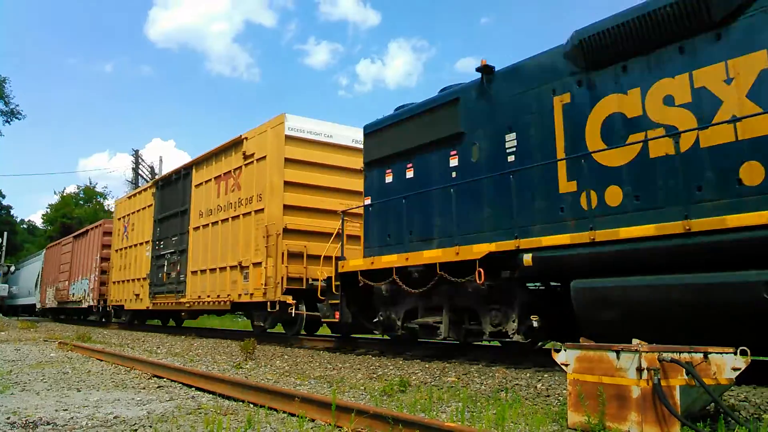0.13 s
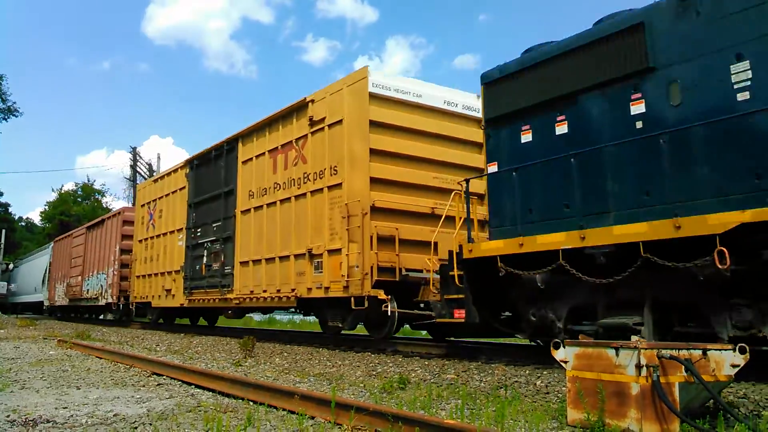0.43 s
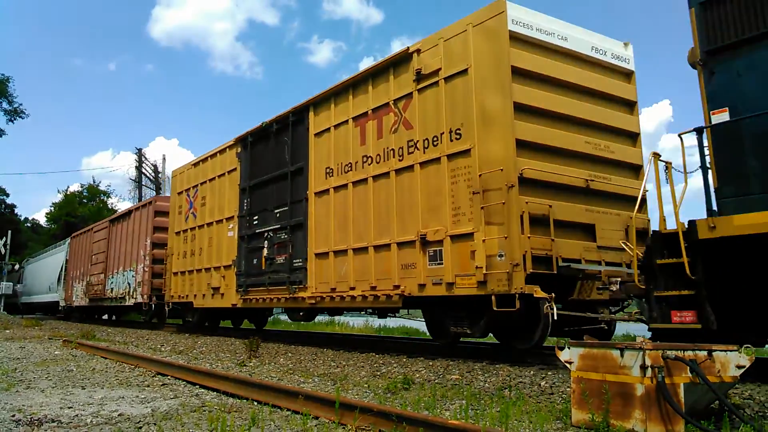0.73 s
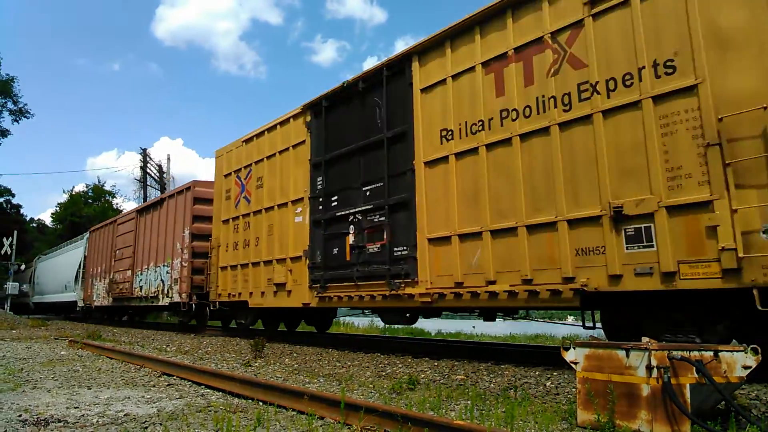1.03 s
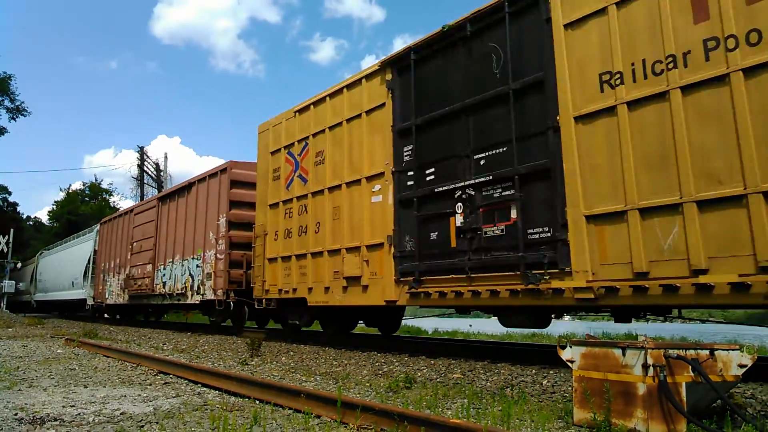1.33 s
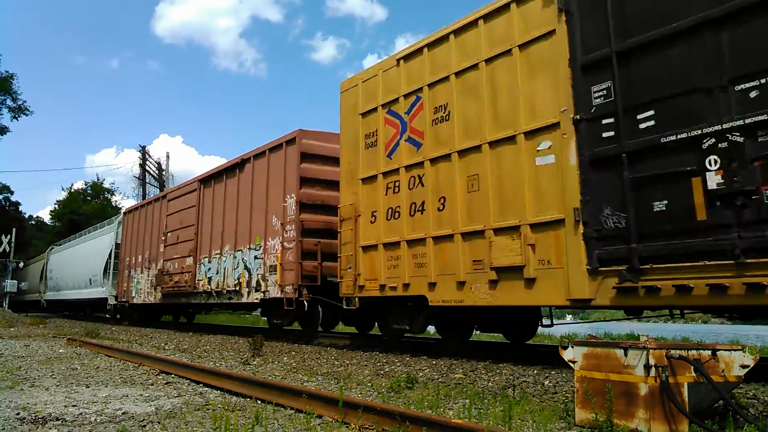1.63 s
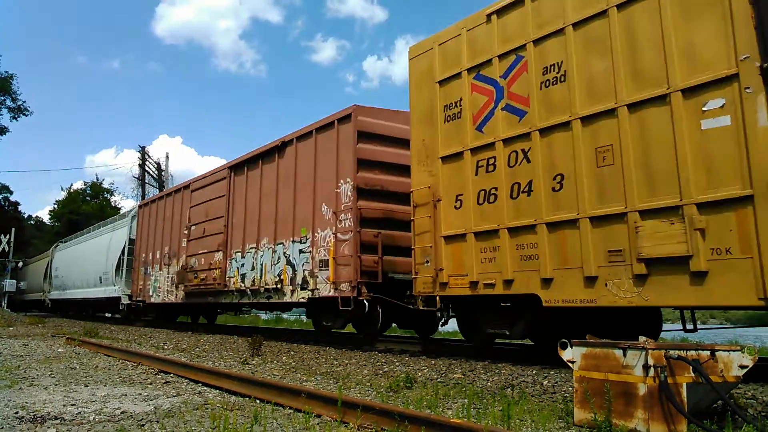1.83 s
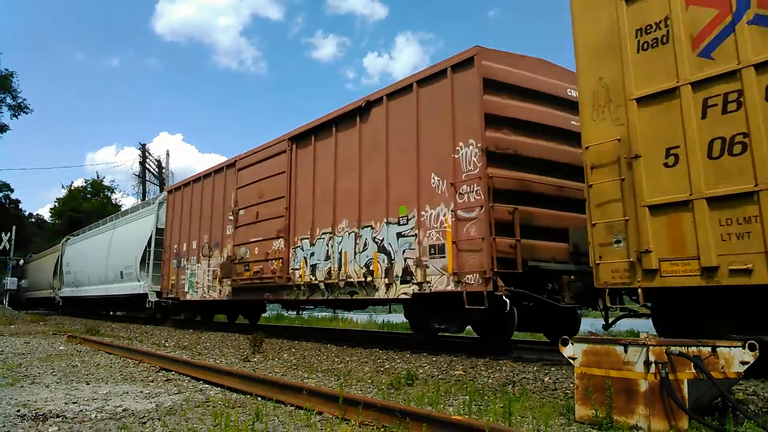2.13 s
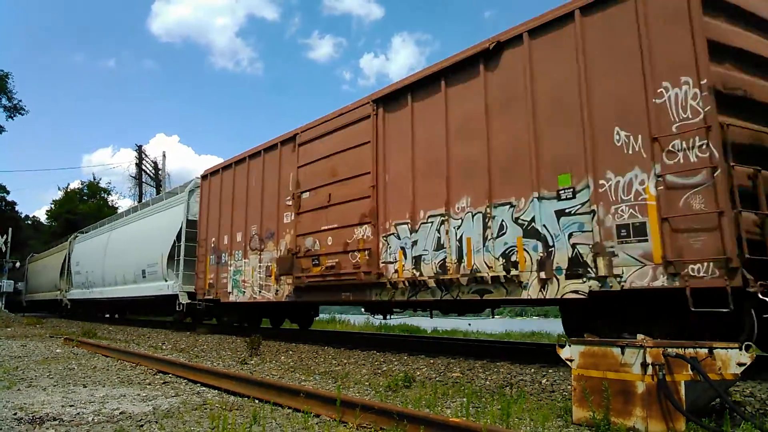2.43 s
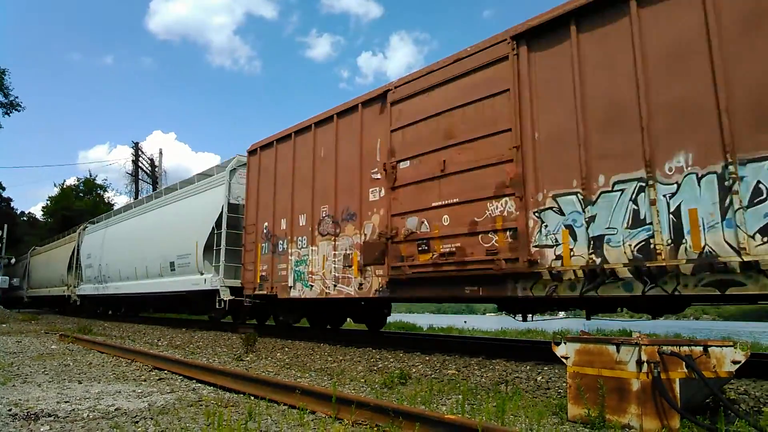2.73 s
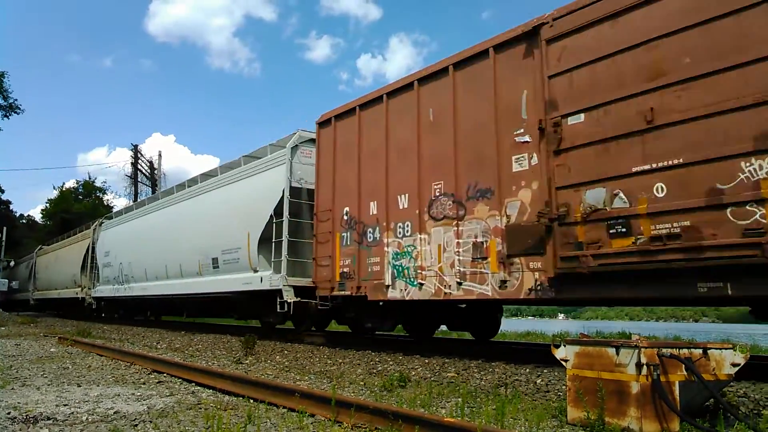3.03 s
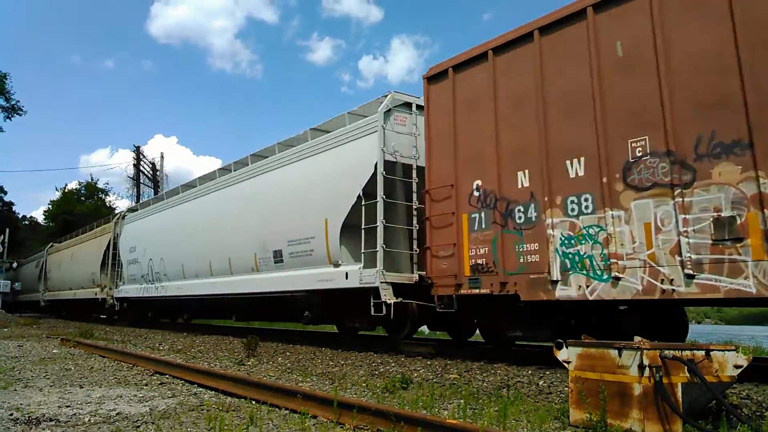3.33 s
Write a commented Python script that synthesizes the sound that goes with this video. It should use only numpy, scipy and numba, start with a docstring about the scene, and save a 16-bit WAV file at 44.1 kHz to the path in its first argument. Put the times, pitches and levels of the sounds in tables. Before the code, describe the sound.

Heavy freight cars rumble past, thudding and hissing, with sharp metallic wheel clangs and brief squeals

```python
"""First the deep rumble and hollow boom of a freight train rolling by close at hand, under a thin steel squeal.
Rolling contact is noise shaped in six frequency ranges; the hollow cars boom as one wavering low resonance.
Wheels strike a spot on the rail: each strike cracks, excites the wheel's modes and rasps through them.
Flanges scrape, scuff and squeal briefly, and couplers and running gear knock.
A dull microphone and a fast limiter follow: loud peaks push the whole sound down for a moment."""
import sys
import numpy as np
from scipy import signal
from scipy.fft import rfft, irfft
from scipy.io import wavfile
from scipy.ndimage import uniform_filter1d, minimum_filter1d
from numba import njit

SR = 44100
rng = np.random.default_rng(int(sys.argv[2]) if len(sys.argv) > 2 else 0)


def inscribe(sig):
    """Save sig as 16-bit PCM at rate SR to the path in sys.argv[1].

    A 1-D sig is mono; a 2-D sig holds one channel per row.
    Samples are clipped to [-1, 1] before scaling.
    """
    pcm = np.round(np.clip(np.atleast_2d(sig).T, -1, 1) * 32767)
    wavfile.write(sys.argv[1], SR, pcm.astype(np.int16))


N = 153468
TIME = np.arange(N) / SR  # [s]

# rolling noise in six ranges, from low to high: (time [s], level [dB]); rumble is lifted by a further 4 dB
RUMBLE = [(0.0, -13.5), (0.45, -17), (0.51, -26), (0.63, -11.5), (0.71, -24), (0.77, -23), (1.16, -15),
          (1.18, -21.5), (1.57, -9), (1.77, -23), (1.86, -10), (2.1, -15), (2.2, -18), (3.01, -17),
          (3.38, -17), (3.48, -22)]
BODY = [(0.0, -13.5), (0.06, -9.5), (1.04, -10), (1.06, -14), (1.34, -15.5), (2.1, -16), (2.14, -24),
        (2.18, -5.5), (2.23, -21.5), (2.6, -9.5), (2.68, -20), (3.08, -5.5), (3.12, -13.5), (3.48, -3.5)]
GROWL = [(0.0, -22.5), (0.21, -14), (0.32, -20), (0.59, -14), (1.32, -19.5), (1.37, -27), (1.45, -16.5),
         (1.85, -21.5), (1.88, -18), (2.01, -23.5), (2.49, -24.5), (2.5, -34), (2.64, -36), (2.67, -32),
         (3.36, -24.5), (3.48, -14.5)]
ROAR = [(0, -26.5), (.2, -21), (.37, -23), (.5, -20), (.72, -20), (.9, -26), (1.03, -22.5), (1.22, -33.5),
        (1.5, -27.5), (1.65, -35), (1.76, -31.5), (1.9, -32.5), (2.1, -34.5), (2.5, -36.5), (2.77, -35),
        (2.93, -28), (3.1, -30), (3.48, -34.5)]
CLATTER = [(0, -28), (.6, -28.5), (.95, -31), (1.5, -34), (1.8, -33), (1.98, -33.5), (2.1, -35.5),
           (2.42, -34), (2.52, -34.5), (2.76, -35), (2.9, -33), (3.48, -31.5)]
HISS = [(0, -23.5), (.2, -24), (.36, -30.5), (.6, -29.5), (.92, -31.5), (1.3, -23), (1.57, -24),
        (1.67, -28), (1.82, -29), (1.95, -29), (2.1, -33.5), (2.26, -28.5), (2.5, -36), (2.65, -32),
        (3.48, -25)]
# borders of those six ranges: [Hz]
RANGE_EDGES_HZ = [20, 110, 380, 680, 1400, 3600, 11000]
# relative spectra of the rolling noise: (frequency [Hz], density [dB per Hz])
LOW_COLOUR = [(20, -39), (31, -7), (40, -33), (50, 6), (63, -5.5), (78, -2.5), (100, -2.5), (140, -4),
              (230, -3), (320, -8.5), (480, -16), (750, -26)]
ROAR_COLOUR = [(600, 2), (750, -2), (950, 0), (1120, -3.5), (1260, -8), (1500, -7)]
HIGH_COLOUR = [(1400, 7), (2000, 3.5), (2700, 2), (3200, 0.5), (3650, -5), (4000, -3), (4300, -5),
               (5000, 1.5), (5700, 3), (6500, -3.5), (7200, -9.5), (7900, -33), (9000, -22), (9800, -38)]
# hollow boom of the car bodies, about which it wavers: (time [s], frequency [Hz], level [dB])
BOOM = [(0, 76.3, -10), (.3, 74.1, -26), (.65, 79.76, -15.5), (.97, 80.6, -17), (1.2, 83, -22.5),
        (1.9, 79.36, -21), (2.3, 74.33, -11), (2.62, 78.66, -9), (2.8, 70.6, -7.5), (2.96, 78.6, -10.5),
        (3.08, 79.3, -23.5), (3.48, 80.4, -10.5)]
# modes of three kinds of wheel: (frequency [Hz], relative level [dB], time to fall by 60 dB [s])
WHEELS = { "bright": [(1860, -12, .7), (3200, -17, .9), (3970, -18, .7), (4702, -7, .45), (4786, -6, .5),
          (5184, -5, .35), (5321, -14, .35), (5429, 1, .45), (5644, -8, .35), (6027, -3, .6),
          (6573, -9, .55), (6770, -6, .4), (7675, -22, .5), (8330, -28, .6)], "shrill": [(1954, -18, .4),
          (3225, -16, .8), (3950, -20, .7), (4519, -11, .4), (4791, -16, .5), (5198, -9, .45),
          (5273, 1, .55), (5424, -7, .45), (5895, -1, 1.1), (6032, -8, .6), (6412, -6, .75), (6603, -2, .7),
          (6681, -8, .6), (9400, -27, .8)], "mellow": [(1577, -16, .35), (2223, -14, .35), (3460, -13, .3),
          (4153, -6, .35), (4239, -11, .4), (4412, -12, .7), (4580, -9, .45), (4685, -2, .6),
          (5015, -4, .35), (5250, 0, .8), (5920, -6, .9), (6420, -16, .4), (6745, -8, .4), (8390, -31, .7),
          (9275, -28, .5)]}
# wheel strikes: (time [s], ring level [dB], crack level [dB], rasp level [dB], rubbing length [s],
# detuning [Hz], most excited frequency [Hz], kind of wheel)
STRIKES = [(1.035, -3.5, -9, -9.5, 0.018, 2.5, 5300, "bright"),
           (1.18, -8, -11.5, -11, 0.055, 5, 6370, "shrill"),
           (2.684, -16, -16.5, -25, 0.017, -23.5, 4650, "mellow"),
           (2.826, -16.5, -18, -26.5, .025, -5.5, 5450, "mellow"),
           (3.017, -10.5, -15.5, -22.5, 0.074, 6, 5240, "mellow"),
           (3.166, -12.5, -10, -23.5, 0.035, -24.5, 4690, "mellow")]
# landings of a hopping wheel: (time [s], level [dB])
HOPS = [(2.718, -17.5), (2.848, -11.5), (3.048, -6), (3.083, -12), (3.19, -19), (3.31, -17)]
# relative spectra of the steel contact: (frequency [Hz], density [dB per Hz])
CRACK_COLOUR = [(500, -29), (1200, -43), (2100, 10), (2800, -22), (3400, 9), (3800, -6), (4800, 11),
                (6700, 6), (7900, -18), (9400, -11), (10000, -49)]
RASP_COLOUR = [(1500, -13.5), (2700, -11.5), (3350, -13.5), (3700, -19), (4500, -13.5), (5400, -5.5),
               (6700, -2), (7100, -3.5), (7650, -6.5), (8050, -40.5), (8500, -12.5), (9450, -22.5),
               (9900, -31.5)]
SCUFF_COLOUR = [(3500, -7), (4600, -4.5), (5600, 6), (6200, -2), (7200, -36)]
# flange scrapes, then short dry scuffs: (time [s], length [s], level [dB])
SCRAPES = [(1.399, 0.084, -14.5), (2.207, 0.015, -30.5)]
SCUFFS = [(0.486, 0.027, -17.5), (0.544, 0.045, -22.5), (1.712, 0.083, -29), (1.902, 0.09, -26)]
# flange squeals: (time [s], length [s], frequency [Hz], waver width [Hz], level [dB])
SQUEALS = [(0, .2, 7050, 25, -36), (0, .22, 9020, 25, -50), (1.415, .07, 2205, 70, -25),
           (1.415, .08, 3965, 120, -25), (1.45, .07, 4480, 70, -28), (1.41, .1, 6450, 130, -22),
           (1.42, .09, 6720, 150, -24), (1.92, .1, 2760, 450, -37), (2.16, .08, 2570, 350, -36),
           (3.1, .2, 5925, 20, -22), (3.34, .04, 2450, 90, -32)]
# knocks of couplers and running gear: (time [s], thud level [dB], clank level [dB], decay constant [s])
KNOCKS = [(0.064, -18, -26, 0.013), (0.203, -6.5, -27.5, 0.0083), (0.252, -16, -20.5, 0.019),
          (.303, -15.5, -31, 0.0091), (.669, -15, -35, 0.015), (.857, -7, -30, 0.0099),
          (1.16, -13, -42, 0.0094), (1.455, -8.5, -31, 0.0097), (1.523, -7, -26, 0.0079),
          (1.61, -14.5, -35, 0.013), (1.703, -14, -33.5, 0.011), (1.875, -12, -50, 0.066),
          (2.191, -27, -26.5, 0.047), (2.245, -14, -27, 0.046), (2.385, -18, -26.5, 0.05),
          (2.428, -22, -33.5, 0.048), (2.456, -17, -45, 0.0058), (2.595, -15.5, -20, 0.0097),
          (2.617, -21, -22.5, 0.032), (2.925, -24, -38, 0.013), (3.004, -23, -28.5, 0.018),
          (3.182, -4, -26, 0.015)]
# relative spectra of the knocks: (frequency [Hz], density [dB per Hz])
THUD_COLOUR = [(60, -21), (140, -1), (240, 10.5), (400, 5), (700, -12), (1400, -55)]
CLANK_COLOUR = [(500, -32), (900, 5), (1250, -2.5), (1650, 6), (2200, 2.5), (3200, -9.5), (4500, -10),
                (7500, -40.5)]
# brief dips of the whole level: (time [s], half width [s], level [dB])
DIPS = [(0.335, 0.015, -5.5), (.652, 0.019, -2), (1.68, 0.02, -2.5)]

# the point of contact favours the modes near one frequency
FAVOUR_DB, FAVOUR_WIDTH_HZ = 3.5, 640
# random roughness (share of the tone) and swelling of each ringing mode
RING_ROUGH, RING_WIDTH_HZ, RING_SWELL_DB, RING_SWELL_RATE_HZ = .4, 35, 2.5, 7
RING_ATTACK_S, CRACK_RELEASE_S, RASP_RELEASE_S = 0.00084, .012, 0.098
# peak width of rubbing noise at a mode, and its floor between modes
RASP_WIDTH_HZ, RASP_BETWEEN_DB = 110, -10
# share of its first pitch that a passing wheel loses each second
DOPPLER_FALL_PER_S = .04
# scales of the shimmering patches in frequency, strength and time
PATCH_SCALE_HZ, PATCH_DB, PATCH_RATE_HZ = 75, 4.5, 10.2
# recording chain; LIMIT is a share of full scale
MIC_TOP_HZ, TOP_HZ, DRIVE_DB = 9600, 16000, -0.5
LIMIT, LIMIT_RELEASE_S = .982, 0.018


def rolling():
    """Roughness excitation: rough wheels on rough rail give rumble, shaking bodies, growl, roar, clatter and hiss."""
    edge = RANGE_EDGES_HZ
    jolt = walk(25)  # shared by the upper four ranges

    rumble = colour(rng.standard_normal(N), LOW_COLOUR, edge[0:2])
    rumble = rumble * undb(curve(RUMBLE) + 4.0)

    body = colour(grit(250, spread_db=-2.0, smooth=1.0), LOW_COLOUR, edge[1:3])
    body = body * undb(curve(BODY) + 1.36 * walk(5.7))

    growl = colour(grit(300, spread_db=1.5, smooth=.9), LOW_COLOUR, edge[2:4])
    growl = growl * undb(curve(GROWL) + 1.3 * jolt)

    roar = colour(grit(500, spread_db=1.5, smooth=.9), ROAR_COLOUR, edge[3:5])
    roar = shimmer(roar, depth=.55) * undb(curve(ROAR) + .8 * jolt)

    clatter = colour(grit(700, spread_db=1.6, smooth=.9), HIGH_COLOUR, edge[4:6])
    clatter = shimmer(clatter) * undb(curve(CLATTER) + .9 * jolt)

    hiss = colour(grit(1500, spread_db=1.8, smooth=.9), HIGH_COLOUR, edge[5:7])
    hiss = shimmer(hiss) * undb(curve(HISS) + .8 * jolt)
    return rumble + body + growl + roar + clatter + hiss


def boom():
    """Cavity resonance: the hollow cars sound one low tone that wavers in pitch and level."""
    frequency = curve(BOOM) + 3 * walk(7.4)
    phase = 2 * np.pi * np.cumsum(frequency) / SR
    level = undb(curve(BOOM, axis=2) + 4.2 * walk(7.4))
    return np.sqrt(2) * np.sin(phase) * level


def wheels():
    """Impact and friction excitation: strikes crack, ring and rasp; rubbing sustains the ring; hops land."""
    out = np.zeros(N)
    crack = colour(rng.standard_normal(N), CRACK_COLOUR)
    rub = colour(rng.standard_normal(N), RASP_COLOUR)
    rasp = {kind: through_wheel(rub, np.array(modes)) for kind, modes in WHEELS.items()}
    for start, ring_db, crack_db, rasp_db, length, detune_hz, favoured_hz, kind in STRIKES:
        first = int(start * SR)
        age = TIME[:min(SR, N - first)]  # each ring is followed for at most 1 s
        ring = wheel_ring(np.array(WHEELS[kind]), age, length, detune_hz, favoured_hz)
        out[first:first + len(age)] += undb(ring_db) * ring
        out += undb(crack_db) * crack * envelope(start - .002, 0.00086, 0.009, CRACK_RELEASE_S)
        out += undb(rasp_db) * rasp[kind] * envelope(start, 0.0067, length, RASP_RELEASE_S)
    landing = through_wheel(crack, np.array(WHEELS["mellow"]))
    for start, db in HOPS:
        out += undb(db) * landing * envelope(start - .002, .002, 0.0035, 0.01)
    return out


def wheel_ring(modes, age, length, detune_hz, favoured_hz):
    """Modal synthesis: decaying partials, weighted by the point of contact, sink in pitch and swell in turn."""
    ring = np.zeros(len(age))
    favour_db = FAVOUR_DB * np.exp(-((modes[:, 0] - favoured_hz) / FAVOUR_WIDTH_HZ) ** 2)
    sizes = undb(modes[:, 1] + favour_db)
    sizes = sizes / np.linalg.norm(sizes)
    attack = np.minimum(age / RING_ATTACK_S, 1)
    for (hz, _, t60), size in zip(modes, sizes):
        sway = (1 + RING_ROUGH * waver(RING_WIDTH_HZ)[:len(age)]) / np.hypot(1, RING_ROUGH)
        sway = sway * undb(RING_SWELL_DB * walk(RING_SWELL_RATE_HZ)[:len(age)])
        cycles = receding(hz + detune_hz, age) + rng.random()
        # the decay waits until the rubbing ends
        decay = np.log(1000) * np.maximum(age - length, 0) / t60
        partial = np.imag(sway * np.exp(2j * np.pi * cycles - decay))
        ring += np.sqrt(2) * size * partial * attack
    return ring


def through_wheel(x, modes):
    """Resonant filtering: rubbing comes out strongest near the wheel's own modes."""
    hz = np.arange(N // 2 + 1) * SR / N
    gap = np.min(np.abs(hz - modes[:, :1]), axis=0)  # distance to the nearest mode [Hz]
    gain = undb(RASP_BETWEEN_DB) + 1 / (1 + (2 * gap / RASP_WIDTH_HZ) ** 2)
    return unit(irfft(rfft(x) * gain, N))


def receding(hz, age):
    """Doppler effect: cycles of a tone whose pitch sinks as its wheel goes by."""
    return hz * (age - DOPPLER_FALL_PER_S * age ** 2 / 2)


def flanges():
    """Sliding friction: flanges grazing the rail give gritty scrapes, dry scuffs and short, rough squeals."""
    rasp = shimmer(colour(rng.standard_normal(N), RASP_COLOUR))
    scuff = shimmer(colour(rng.standard_normal(N), SCUFF_COLOUR))
    rasp = through_wheel(rasp, np.array(WHEELS["shrill"]))
    out = np.zeros(N)
    for start, length, db in SCRAPES:
        out += undb(db) * rasp * envelope(start, 0.012, length, 0.075)
    for start, length, db in SCUFFS:
        out += undb(db) * scuff * envelope(start, 0.024, length, 0.026)
    for start, length, hz, width_hz, db in SQUEALS:
        carrier = np.exp(2j * np.pi * receding(hz, TIME - start))
        tone = np.sqrt(2) * np.real(waver(width_hz) * carrier)
        out += undb(db) * tone * envelope(start, 0.004, length, 0.042)
    return out


def knocks():
    """Impact of slack parts: each bump joins a thud of the car to a dull clank."""
    thud = colour(rng.standard_normal(N), THUD_COLOUR)
    clank = shimmer(colour(rng.standard_normal(N), CLANK_COLOUR))
    out = np.zeros(N)
    for start, thud_db, clank_db, decay in KNOCKS:
        bump = undb(thud_db) * thud + undb(clank_db) * clank
        out += bump * envelope(start, 0.00071, 0.014, decay)
    return out


def dips():
    """Amplitude modulation: the level dips briefly now and then."""
    return undb(sum(db * np.exp(-((TIME - middle) / width) ** 2) for middle, width, db in DIPS))


def shimmer(x, depth=1):
    """Drifting resonance: neighbouring frequencies of the steel swell and fade together."""
    hz, times, spectrum = signal.stft(x, SR, nperseg=1024)
    field = rng.standard_normal(spectrum.shape)
    across = np.fft.fftfreq(len(hz), hz[1])[:, None]
    along = np.fft.fftfreq(len(times), times[1])
    # blur chance into patches over frequency and time
    blur = np.exp(-.5 * ((2 * across * PATCH_SCALE_HZ) ** 2 + (along / PATCH_RATE_HZ) ** 2))
    field = unit(np.fft.ifft2(np.fft.fft2(field) * blur).real)
    shimmering = signal.istft(spectrum * undb(depth * PATCH_DB * field), SR)[1]
    return unit(shimmering[:N])


def grit(rate, spread_db, smooth):
    """Shot noise: random tiny collisions (rate per second) of uneven size over a smooth rush."""
    happens = rng.random(N) < rate / SR
    strength = rng.standard_normal(N)
    size = undb(spread_db * np.minimum(rng.exponential(size=N), 4))
    return unit(happens * strength * size) + smooth * rng.standard_normal(N)


def colour(x, points, band=(1, SR)):
    """Spectral shaping: give a sound a spectrum, inside a band [Hz] with steep sides, at unit power."""
    hz = np.arange(1, N // 2 + 2) * SR / N
    p = np.array(points, float)
    gain = undb(np.interp(np.log(hz), np.log(p[:, 0]), p[:, 1]))
    gain = gain / np.sqrt((1 + (band[0] / hz) ** 16) * (1 + (hz / band[1]) ** 16))
    return unit(irfft(rfft(x) * gain, N))


def waver(width_hz):
    """Narrow-band noise: random swaying of a tone's strength and phase, through two equal poles."""
    rate = 2000  # knots per second
    knots = np.arange(0, N / SR + .01, 1 / rate)
    pole = np.exp(-np.pi * width_hz / rate)
    chance = rng.standard_normal(len(knots)) + 1j * rng.standard_normal(len(knots))
    sway = signal.lfilter([1], [1, -2 * pole, pole ** 2], chance)
    return np.interp(TIME, knots, unit(sway))


def walk(rate_hz):
    """Low-pass noise: smooth chance with a spread of 1."""
    rate = 400  # knots per second
    knots = np.arange(0, N / SR + .01, 1 / rate)
    hz = np.fft.rfftfreq(len(knots), 1 / rate)
    spectrum = rfft(rng.standard_normal(len(knots))) * np.exp(-.5 * (hz / rate_hz) ** 2)
    return np.interp(TIME, knots, unit(irfft(spectrum, len(knots))))


def envelope(start, attack, hold, release):
    """Transient decay: straight rise, full level until hold [s] after the start, then exponential fall."""
    age = TIME - start
    return np.clip(age / attack, 0, 1) * np.exp(-np.maximum(age - hold, 0) / release)


def curve(rows, axis=1):
    """Linear interpolation: one column of a table, joined by straight lines in time."""
    rows = np.array(rows, float)
    return np.interp(TIME, rows[:, 0], rows[:, axis])


def undb(db):
    """Decibel law: the amplitude ratio of a level."""
    return 10 ** (np.asarray(db) / 20)


def unit(x):
    """Power normalisation: scale to a root mean square of 1."""
    return x / np.sqrt(np.mean(np.abs(x) ** 2))


def scene():
    """Superposition: all sources add, and the dips act on their sum."""
    train = rolling() + boom() + wheels() + flanges() + knocks()
    return (dips() * train)[None]


@njit
def follow(peak, fall):
    """Peak detection: jumps to each peak and sinks back exponentially."""
    out, held = np.empty(len(peak)), 0.
    for i in range(len(peak)):
        held = max(peak[i], held * fall)
        out[i] = held
    return out


def record(dry):
    """Band limiting and gain control: a dull microphone, a fast limiter, clipping of any overshoot, a low-pass."""
    microphone = signal.ellip(8, .2, 70, MIC_TOP_HZ, fs=SR, output="sos")
    x = signal.sosfilt(microphone, dry[0]) * undb(DRIVE_DB)
    peaks = follow(np.abs(x), np.exp(-1 / (LIMIT_RELEASE_S * SR)))
    gain = LIMIT / np.maximum(peaks, LIMIT)
    # centred windows [samples] let the gain begin to fall before a peak
    gain = uniform_filter1d(minimum_filter1d(gain, size=91), size=129)
    clipped = np.clip(x * gain, -1, 1)
    top = signal.ellip(8, .2, 70, TOP_HZ, fs=SR, output="sos")
    return signal.sosfilt(top, clipped)[None]


dry = scene()
out = record(dry)
inscribe(out)
```